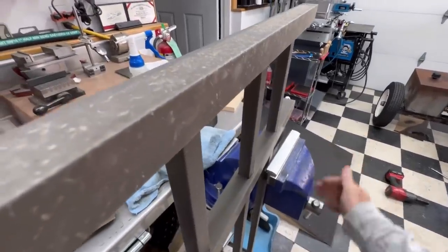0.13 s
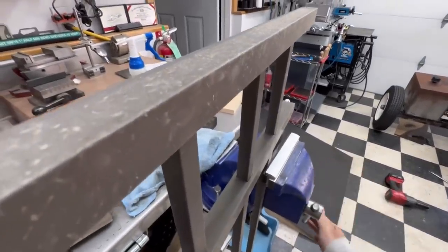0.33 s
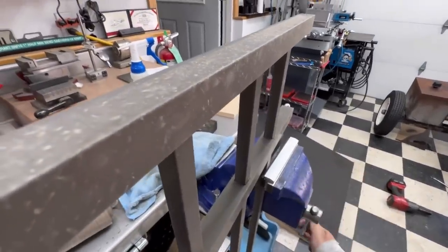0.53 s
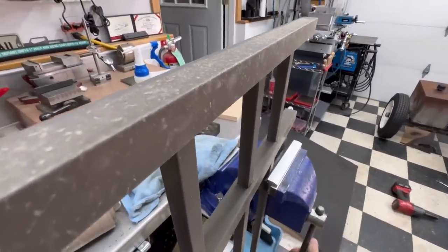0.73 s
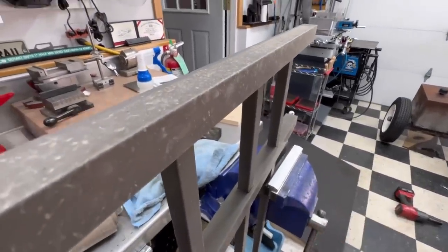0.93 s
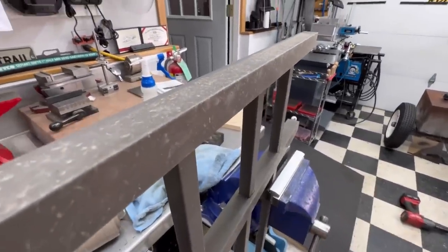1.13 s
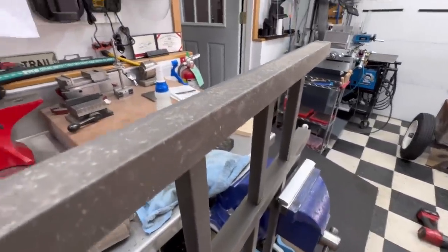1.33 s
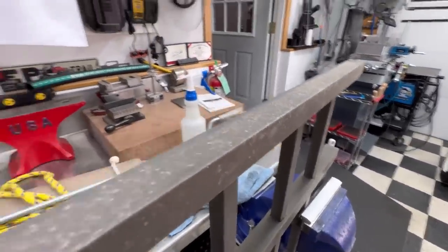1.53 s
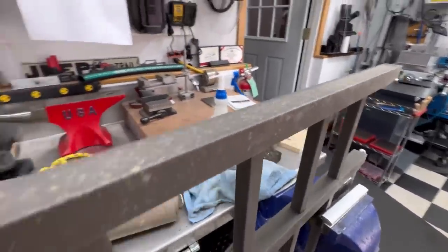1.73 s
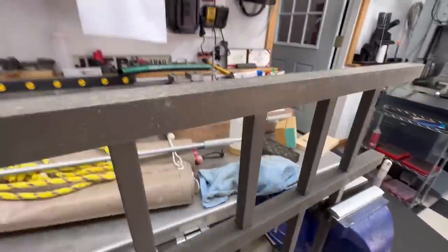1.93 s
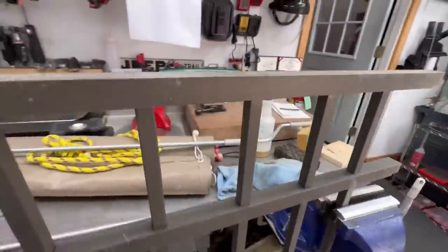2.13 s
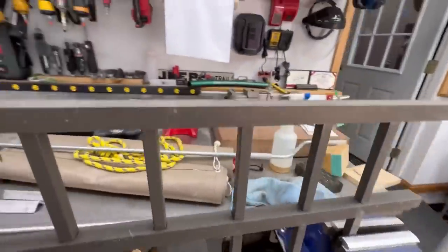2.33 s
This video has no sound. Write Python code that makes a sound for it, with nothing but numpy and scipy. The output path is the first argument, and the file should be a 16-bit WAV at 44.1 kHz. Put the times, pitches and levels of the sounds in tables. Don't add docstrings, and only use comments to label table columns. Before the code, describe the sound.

A steel bench vise handle clanks, knocks, scrapes through its hole and clanks hard again indoors

```python
import sys
import numpy as np
from scipy import signal
from scipy.fft import rfft, irfft, next_fast_len
from scipy.io import wavfile
from scipy.ndimage import map_coordinates

SR = 44100
rng = np.random.default_rng(int(sys.argv[2]) if len(sys.argv) > 2 else 0)


def magnitude_from_level(level_db):
    exponent = np.asarray(level_db, float) / 20
    return 10 ** exponent


def dump(signal):
    limited = np.clip(np.atleast_2d(signal).T, -1, 1)
    pcm = np.round(limited * 32767).astype(np.int16)
    wavfile.write(sys.argv[1], SR, pcm)


N = 105222


def unit(x):
    return x / np.sqrt(np.mean(x ** 2) + 1e-20)


def along(points, hz):
    f, v = np.transpose(points)
    return np.interp(np.log(hz + 1), np.log(f + 1), v)


def curves(rows, outside=-120):
    s, *columns = np.transpose(rows)
    t = np.arange(N) / SR
    return [np.interp(t, s, column, outside, outside) for column in columns]


def wobble(rate, size=N):
    knots = rng.standard_normal(int(size * rate / SR) + 4)
    return map_coordinates(knots, [np.arange(size) * rate / SR])


def filtered(x, response):
    m = next_fast_len(x.shape[-1] + SR // 4)
    spectrum = rfft(x, m) * response(np.fft.rfftfreq(m, 1 / SR))
    return irfft(spectrum, m)[..., :x.shape[-1]]


def resonances(peaks):
    def response(f):
        total = 0
        for k, (centre, width, db) in enumerate(peaks):
            total = total + (-1) ** k * magnitude_from_level(db) * 1j * f * width / (centre ** 2 - f ** 2 + 1j * f * width)
        return total
    return response


def pair(response, alike):
    a, b = filtered(rng.standard_normal((2, N)), response)
    turn = np.arccos(np.clip(alike, -1, 1)) / 2
    shared, apart = np.cos(turn) * a, np.sin(turn) * b
    return unit(np.array([shared + apart, shared - apart]))


def burst(t60, response, attack_s):
    t = np.arange(SR // 8) / SR
    noise = unit(filtered(rng.standard_normal(len(t)), response))
    return noise * magnitude_from_level(-60 * t / t60) * (1 - np.exp(-t / attack_s))


def add(out, s, x, wet_db, pan_db=0, lag=6):
    # f/Hz, time to fall 60 dB/s
    room_t60 = [(150, 0.63), (1000, 0.41), (4000, 0.38), (10000, 0.22), (15000, 0.095)]
    hz, t, z = signal.stft(rng.standard_normal((2, SR // 2)), SR, nperseg=256)
    fading = z * magnitude_from_level(-60 * t / along(room_t60, hz)[:, None])
    tail = signal.istft(fading, SR, nperseg=256)[1]
    tail = tail / np.linalg.norm(tail[0])
    delayed = np.pad(x, (200, 0))[None]
    both = magnitude_from_level(wet_db) * signal.fftconvolve(delayed, tail, axes=1)
    sides = np.array([[-1], [1]])
    both[:, :len(x)] += filtered(x, lambda f: np.exp(1j * np.pi * f * lag / SR * sides))
    both = both * magnitude_from_level(-sides * pan_db / 2)
    at = max(round(s * SR), 0)
    out[:, at:at + both.shape[1]] += both[:, :N - at]


SWELL_DB = 1.2
GRAIN_DB = 1.5


def air():
    # f/Hz, level per Hz/dB
    hum_colour = [(25, -24), (50, -0.5), (145, -5), (230, -4.5), (600, -16.5), (1900, -15), (2500, -48),
                  (4000, -44)]
    # t/s, level/dB
    hum_level = [(0, -54), (.45, -58.5), (.75, -59.5), (1.0, -61), (1.12, -65.5), (1.3, -61.5),
                 (1.95, -53.5), (2.386, -63)]
    # f/Hz, likeness (1 = same)
    likeness = [(40, 0), (150, 0.96), (400, 0.25), (1000, 0), (10000, 0)]
    # f/Hz, level per Hz/dB
    hiss_colour = [(1500, -2), (2500, 6.5), (6500, 4.5), (8000, -8), (10500, 1), (14500, -14.5),
                   (15300, -37)]
    level_db, = curves(hum_level, outside=-62)

    def middle_and_side(f):
        turn = np.arccos(np.clip(along(likeness, f), -1, 1)) / 2
        return magnitude_from_level(along(hum_colour, f)) * np.array([np.cos(turn), np.sin(turn)])

    mid, side = filtered(rng.standard_normal((2, N)), middle_and_side)
    hum = unit(np.array([mid + side, mid - side]))
    hiss = pair(lambda f: magnitude_from_level(along(hiss_colour, f)) * (f > 1200), 0.39)
    return magnitude_from_level(level_db + SWELL_DB * wobble(13.14)) * hum + magnitude_from_level(-77.5) * hiss


def sleeve():
    # t/s, rub level/dB, fizz level/dB
    rustle = [(1.82, -56, -62), (1.95, -56.5, -65.5), (2.02, -47.5, -61), (2.14, -49.5, -60),
              (2.23, -57.5, -56.5), (2.3, -65, -58), (2.35, -58, -59.5), (2.386, -47.5, -54.5)]
    # f/Hz, level per Hz/dB
    rub_colour = [(200, -7.5), (500, -16), (850, -2), (1370, -3), (1800, -9.5), (2500, -16), (7000, -37),
                  (10000, -54)]
    # f/Hz, level per Hz/dB
    fizz_colour = [(2000, -13), (3500, -7.5), (5500, -6.5), (7000, -9), (9000, -3.5), (11000, -10.5),
                   (15000, -24), (16000, -40)]
    rub_db, fizz_db = curves(rustle)
    clump_db = 2.2
    rub = pair(lambda f: magnitude_from_level(along(rub_colour, f)), 0.33)
    fizz = pair(lambda f: magnitude_from_level(along(fizz_colour, f)), 0.19)
    out = magnitude_from_level(rub_db + clump_db * wobble(40.38) + GRAIN_DB * wobble(200)) * rub
    return out + magnitude_from_level(fizz_db + SWELL_DB * wobble(70) + GRAIN_DB * wobble(240)) * fizz


def ticks():
    # t/s, level/dB, brightness per octave/dB, left over right/dB, time to fall 60 dB/s
    dry_ticks = [(.3675, -35, -4, 13, 0.029), (0.3693, -23.5, -0.5, 2.5, 0.0092),
                 (0.3721, -34.5, -9, -2.5, 0.019), (0.375, -36, -4.5, 1, 0.015),
                 (1.32, -47.5, -6, 0, 0.023), (2.0, -58.5, -5, 1, .1), (2.198, -53, -6, 10, .05),
                 (2.228, -49, -3, 2, .05), (2.269, -53, -5, 2, 0.046), (2.3105, -32, 7, 1.5, 0.017),
                 (2.314, -42, -3, 15, 0.022)]
    # f/Hz, level per Hz/dB
    tick_colour = [(500, -36), (1500, -7.5), (3000, -14.5), (6000, -7.5), (9300, 2.5), (12000, 5),
                   (15600, 2), (16400, -29)]
    out, t = np.zeros((2, N)), np.arange(SR // 8) / SR
    ring = magnitude_from_level(-29 - 60 * t / 0.14) * np.sin(2 * np.pi * 5750 * t)
    for s, db, tilt_db, pan_db, t60 in dry_ticks:
        def colour(f):
            octaves = np.log2(np.clip(f, 1500, None) / 8000)
            return magnitude_from_level(along(tick_colour, f) + tilt_db * octaves)
        x = burst(t60, colour, 0.00071) + ring
        if t60 < 0.015:
            snap = irfft(unit(colour(np.fft.rfftfreq(64, 1 / SR))))
            x[:64] += 2.4 * np.roll(snap, 32)
        add(out, s, magnitude_from_level(db) * x, wet_db=-6.5, pan_db=pan_db, lag=11.6)
    return out


def whistles():
    # t/s, f/Hz, level/dB
    squeaks = [
        [(.795, 3120, -66), (.84, 3100, -74), (.87, 3130, -73), (.93, 3150, -77), (.98, 3130, -78),
         (.995, 3150, -66), (1.05, 3120, -71), (1.07, 3120, -80), (1.12, 3120, -78)],
        [(.885, 2760, -82), (.9, 2760, -69), (.915, 2760, -78), (.935, 2765, -66), (.97, 2760, -69),
         (.99, 2780, -78), (1.06, 2800, -77), (1.08, 2780, -86)],
        [(.93, 2920, -82), (.95, 2960, -68), (.972, 3010, -65), (.99, 3100, -69), (1.01, 3200, -78)],
        [(1.225, 9000, -78), (1.24, 8700, -76), (1.255, 9900, -68), (1.288, 11250, -70), (1.305, 10300, -76)],
        [(1.2, 8800, -82), (1.22, 9900, -77), (1.24, 11300, -84)],
        [(1.21, 5300, -79), (1.245, 5900, -73), (1.31, 6100, -76)],
        [(1.34, 8500, -78), (1.38, 8900, -72), (1.405, 9700, -66), (1.42, 10000, -63), (1.44, 10150, -72),
         (1.55, 10300, -76), (1.62, 9700, -70)],
        [(1.4, 10400, -78), (1.46, 11200, -72), (1.52, 11500, -70), (1.58, 11500, -74), (1.62, 11000, -78)],
    ]
    warble_hz, flicker_db = 48, 4
    out = np.zeros((2, N))
    for rows in squeaks:
        hz, db = curves(rows)
        phase = 2 * np.pi * np.cumsum(hz + warble_hz * wobble(300)) / SR
        flicker = flicker_db * np.array([wobble(80), wobble(84)])
        out += magnitude_from_level(db + flicker) * np.sin(phase + np.array([[0], [1.2]]))
    return out


def slide():
    # t/s, level/dB
    pressure = [(1.15, -77), (1.2, -72.5), (1.28, -55.5), (1.34, -53), (1.41, -43), (1.62, -41.5),
                (1.7, -50.5), (1.76, -40), (1.82, -51)]
    # f/Hz, width/Hz, level/dB
    bore_peaks = [(300, 74, 0), (800, 1100, -4), (1516, 540, 5.5), (1886, 420, 2), (2660, 380, -3),
                  (4590, 400, -13), (6380, 1570, -18), (8940, 1800, -19.5), (11400, 14000, -29.5)]
    pressure_db, = curves(pressure)

    def bore(f):
        power = 0
        for centre, width, db in bore_peaks:
            power = power + abs(resonances([(centre, width, db)])(f)) ** 4 / magnitude_from_level(2 * db)
        return np.sqrt(power) / (1 + (f / 12600) ** 12)

    return magnitude_from_level(pressure_db + SWELL_DB * wobble(28.97) + GRAIN_DB * wobble(250)) * pair(bore, 0.15)


def bench():
    # t/s, level/dB, f/Hz
    booms = [
        (0.082, -43, 151.3),
        (0.233, -43.5, 146.7),
        (0.816, -38.5, 149.7),
        (1.656, -36.5, 140),
        (1.717, -42, 142.4),
        (0.847, -44, 76),
        (1.777, -38, 147.2),
        (1.809, -42, 180.5),
        (1.815, -42, 139.7),
    ]
    attack_s, t60 = 0.005, 0.19
    out, t = np.zeros((2, N)), np.arange(SR // 3) / SR
    for s, db, hz in booms:
        tone = np.sin(2 * np.pi * hz * t)
        tone += magnitude_from_level(-17.5) * np.sin(2 * np.pi * hz * 0.798 * t)
        swell = 1 - np.exp(-(t / attack_s) ** 2)
        add(out, s, magnitude_from_level(db + 5.5 - 60 * t / t60) * swell * tone, wet_db=-15)
    return out


def casting():
    # t/s, level/dB, time to fall 60 dB/s, struck pitch f/Hz, lowest part shaken f/Hz
    knocks = [(.222, -39, 0.049, 439, 300), (.226, -45.5, 0.16, 1490, 1000), (.783, -37, 0.029, 1110, 100),
              (.794, -25.5, 0.057, 915, 99), (.826, -33.5, 0.022, 280, 100), (0.86, -54, 0.092, 305, 102),
              (1.289, -43, 0.059, 300, 154), (1.63, -34.5, 0.1, 940, 500), (1.6413, -26, 0.056, 1295, 800),
              (1.65, -30, .06, 598, 438), (1.663, -39, 0.026, 960, 397), (1.75, -46, 0.074, 1690, 900),
              (1.764, -30.5, 0.13, 1260, 584), (1.795, -36.5, 0.047, 916, 700),
              (1.803, -50, 0.037, 1286, 700), (2.368, -70, 0.093, 800, 500), (2.376, -44, 0.063, 1700, 600),
              (2.381, -43, 0.056, 960, 606)]
    # f/Hz, width/Hz, level/dB
    body_peaks = [(280, 107, 5), (654, 32, -1.5), (800, 108, -5.5), (1257, 310, -5), (1690, 126, -4),
                  (3230, 69, -58)]
    attack_s = 0.003
    out = np.zeros((2, N))
    for s, db, t60, hz, low_hz in knocks:
        body = resonances(body_peaks + [(hz, 55, 6.5)])
        blow = burst(t60, np.ones_like, attack_s)
        blow[round(attack_s * SR)] += 5

        def dull_body(f):
            soft = 1 / (1 + 1j * f / 2400) ** 2
            no_bass = (1j * f / (low_hz + 1j * f)) ** 3
            return body(f) * soft * no_bass

        thud = filtered(blow, dull_body)
        add(out, s, magnitude_from_level(db) * thud / abs(thud).max(), wet_db=-3.5)
    return out


def handle():
    # t/s, level/dB
    clanks = [(0.0, -27.5), (.044, -37), (.062, -40.5), (.088, -41), (0.219, -45.5), (1.295, -48),
              (1.628, -68), (1.64, -49.5), (1.751, -52), (1.7612, -27.5), (1.7637, -30.5)]
    # share of free ring time, ring over crack/dB,
    # tilt per octave above 10 kHz/dB, pitch nearest the blow f/Hz
    grips = [(.75, -11, 0, 1437), (.3, -10, -9, 9851), (.3, -10, -9, 3930), (.5, -10, -9, 6135),
             (.4, -22, -9, 4054), (.2, -25, -20, 5904), (.4, -4, 0, 14325), (.4, -20, -20, 3930),
             (.25, -18, -20, 9851), (.2, -10, -22, 6067), (.22, -9, -30, 9851)]
    # f/Hz, level per Hz/dB
    crack_colour = [(150, -4.5), (450, -1), (1410, 0.5), (2300, -8), (3900, 4), (6000, -3), (10000, -7.5),
                    (11900, -17), (12500, -70)]
    bar_hz = [1437, 1760, 3790, 3930, 4054, 4791, 5335, 5904, 6067, 6135, 7790, 9851, 11580, 14325]
    bar_db = [-12, -11, -9, -7, -11, -14, -10, -9, -5, -7, -11, -8, -20, -9]
    bar_t60 = [.07, .15, .22, .22, .25, .2, .22, .2, .25, .28, .2, .26, .2, .3]
    rattle_db, rattle_rate = 5, 170
    out, t = np.zeros((2, N)), np.arange(SR // 3) / SR
    for (s, db), (free, ring_db, tilt_db, near_hz) in zip(clanks, grips):
        ring = np.zeros(len(t))
        for hz, level, t60 in zip(bar_hz, bar_db, bar_t60):
            nearest_db = 10 * (hz == near_hz)
            flutter = rattle_db * wobble(rattle_rate, size=len(t))
            loudness = magnitude_from_level(level + nearest_db + flutter - 60 * t / (t60 * free))
            ring += loudness * np.sin(2 * np.pi * (hz * t + rng.random()))
        x = magnitude_from_level(ring_db) * ring * (1 - np.exp(-t / 0.0011))
        x[:SR // 8] += burst(0.13 * free, lambda f: magnitude_from_level(along(crack_colour, f)), 0.00021)
        x = filtered(x, lambda f: magnitude_from_level(tilt_db * np.log2(np.clip(f / 10000, 1, None))))
        add(out, s, magnitude_from_level(db) * x, wet_db=-2.0)
    return out


def scene():
    return air() + sleeve() + ticks() + whistles() + slide() + bench() + casting() + handle()


def top_cut(x):
    return signal.sosfilt(signal.butter(12, 16760, fs=SR, output="sos"), x)


def record(dry):
    # f/Hz, left over right/dB
    balance = [(60, 2.5), (150, 2.5), (380, -0.5), (950, 2.5), (2380, 8.5), (5980, 9.5), (15000, -9)]

    def openings(f):
        dip_db = -11 * np.exp(-((f - 7550) / 200) ** 2)
        sides_db = along(balance, f) * np.array([[0.5], [-0.5]])
        return (f < 16300) * magnitude_from_level(dip_db + sides_db)

    return top_cut(filtered(dry, openings))


dry = scene()
out = record(dry)
dump(out)
```